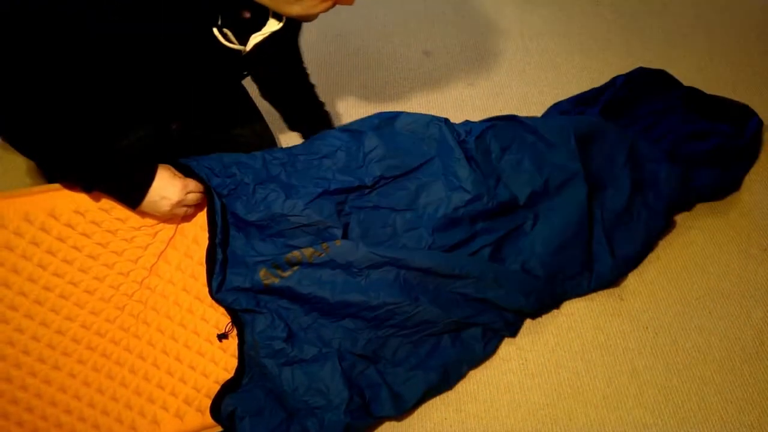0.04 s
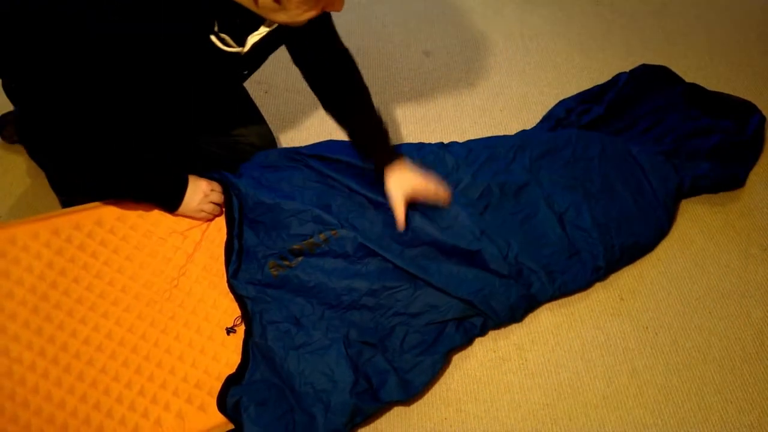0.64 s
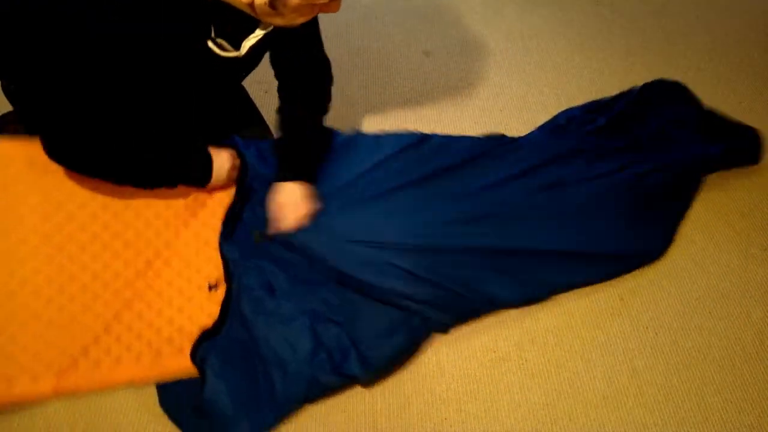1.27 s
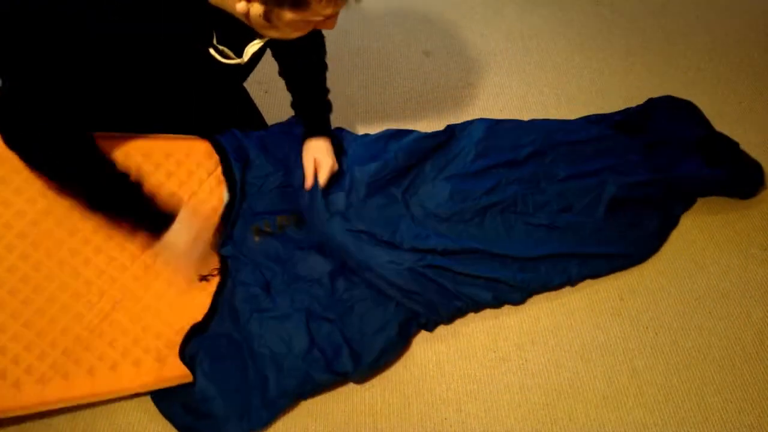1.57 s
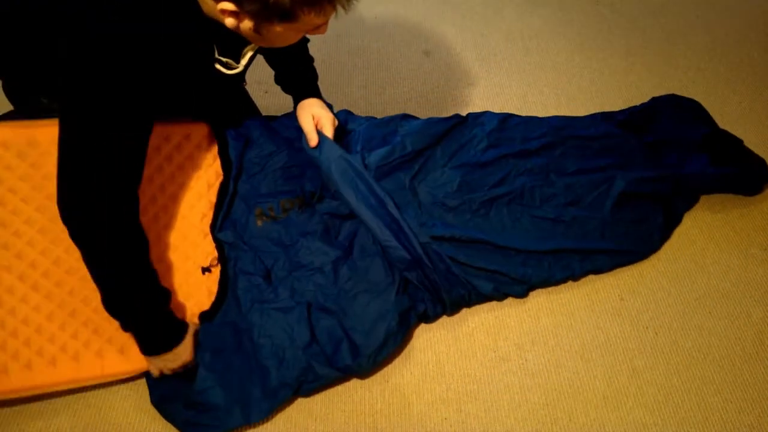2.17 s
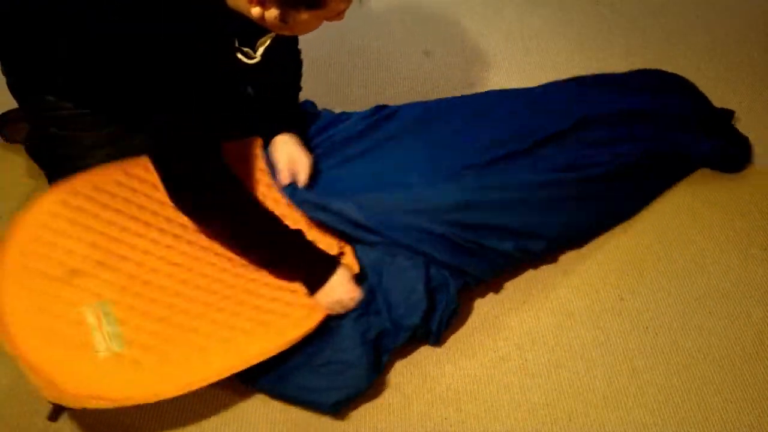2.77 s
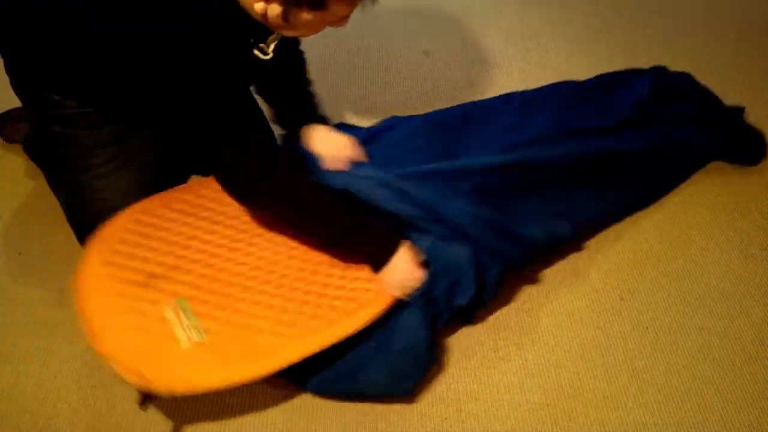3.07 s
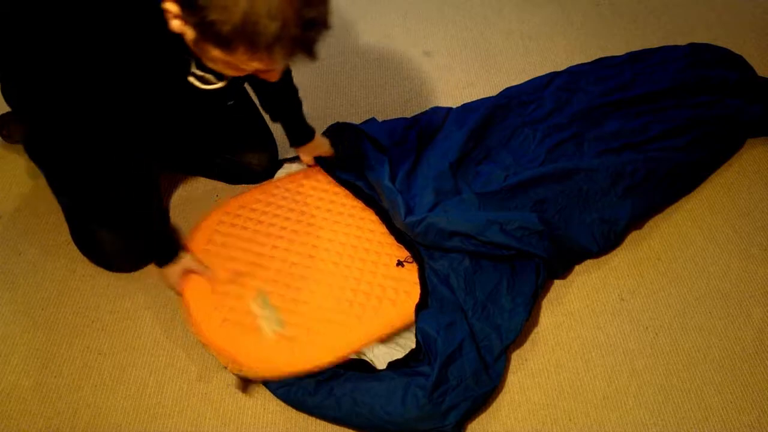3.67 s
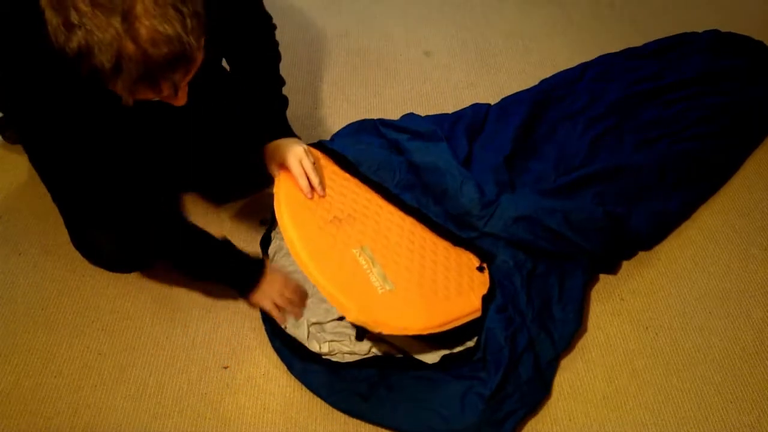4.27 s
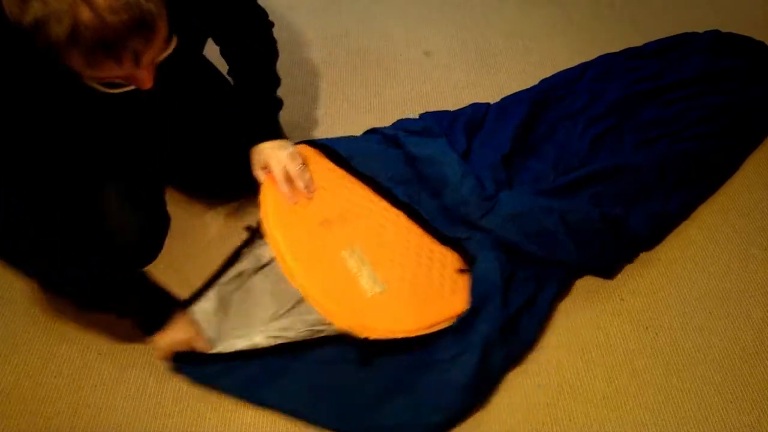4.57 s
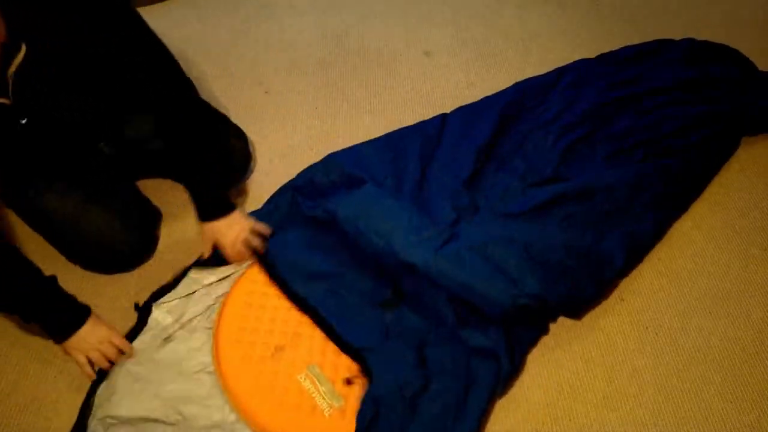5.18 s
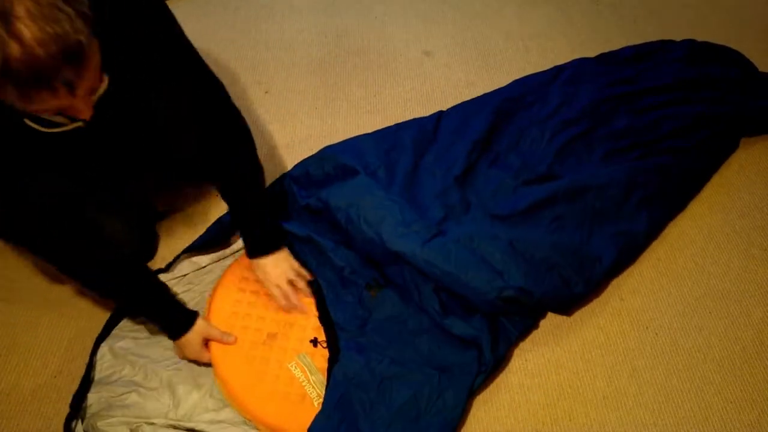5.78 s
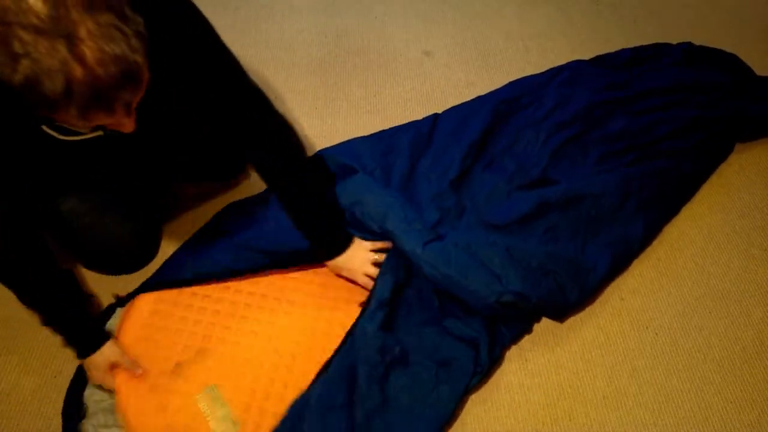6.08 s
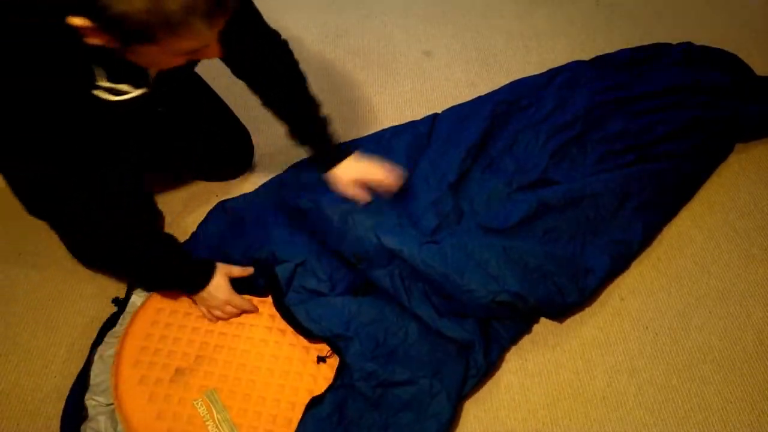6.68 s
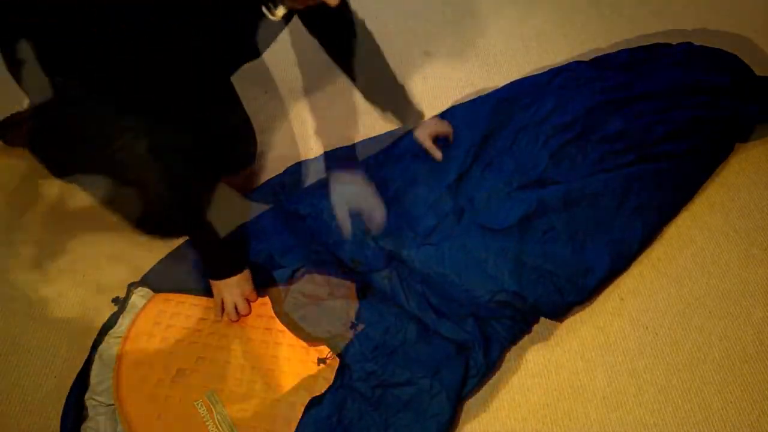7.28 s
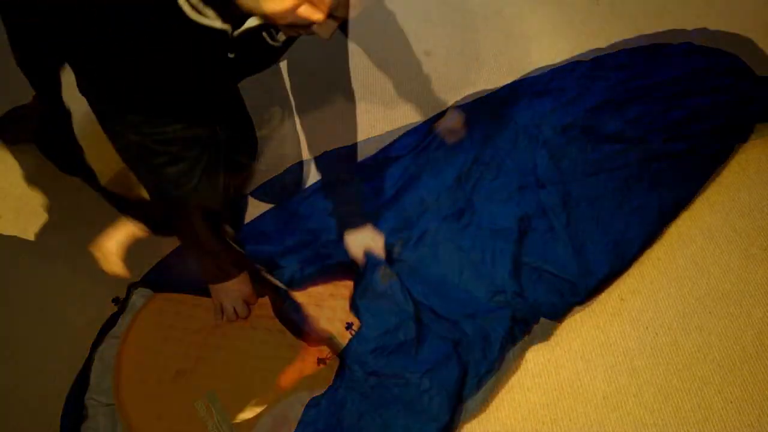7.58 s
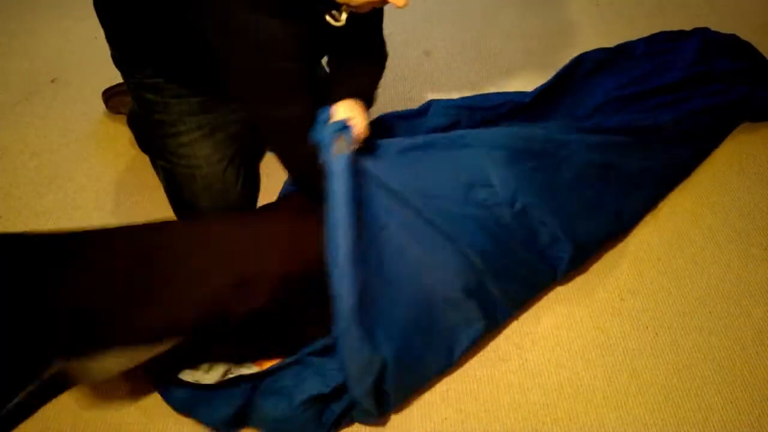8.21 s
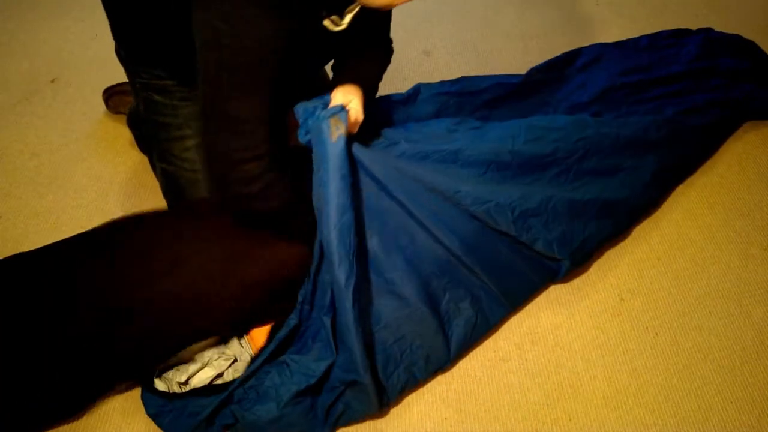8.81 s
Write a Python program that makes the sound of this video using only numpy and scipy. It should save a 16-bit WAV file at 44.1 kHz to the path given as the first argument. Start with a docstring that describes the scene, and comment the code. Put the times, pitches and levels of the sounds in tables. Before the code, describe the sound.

A waterproof sleeping bag cover swishes and crinkles in uneven strokes as someone tugs it over a padded mat and bedding. The loudest pulls come first, with sharp crease snaps and a hollow pat on the mat. Softer rustling follows, mixed with brief scuffs, faint squeaks and dull thuds of hands and knees on carpet, then another cluster of tugs near the end. It sounds close, in stereo, in a small room with a faint hum.

```python
"""Coated cloth of a waterproof bivvy bag swishes and crinkles as a sleeping mat and bedding are pushed in.
Each stroke is rubbing noise plus tiny buckles: taut cloth hisses, slack cloth flaps. Creases snap,
jerks release sprays of wrinkles, dragged threads squeak and the hollow mat scuffs.
Hands pat the mat; hands and knees thud on the carpeted floor. A small room with a faint hum answers,
and two closely spaced microphone ports each colour the treble in their own way."""
import sys
import numpy as np
from scipy import signal
from scipy.fft import rfft, irfft, next_fast_len
from scipy.io import wavfile
from scipy.ndimage import uniform_filter1d

SR = 44100
rng = np.random.default_rng(int(sys.argv[2]) if len(sys.argv) > 2 else 0)


def bounce(signal):
    """Save signal as a 16-bit WAV file at the path given by the first command-line argument."""
    frames = np.transpose(np.atleast_2d(signal))
    limited = np.clip(frames, -1, 1)
    pcm = np.round(limited * 32767).astype(np.int16)
    wavfile.write(sys.argv[1], SR, pcm)


N = 390285

# steady background: low room rumble, faint high microphone hiss (frequency [Hz], density [dB])
BACKGROUND_SPECTRUM = [(25, -19), (45, -8), (60, 3), (85, -5), (150, -3), (300, -7), (700, -12),
                       (2000, -24), (6000, -32.5), (12000, -23), (15000, -33)]
# low hum (frequency [Hz], rms level [dB])
HUM_TONES = [(83, -66.5)]
# room decay (frequency [Hz], t60 [s])
ROOM_T60 = [(200, 0.34), (1400, 0.27), (4000, 0.42), (10000, 0.3)]
# room peaks and dips (frequency [Hz], width [Hz], gain [dB])
ROOM_MODES = [(57, 30, -23), (93, 16, 4.5), (155, 59, -3.5), (251, 12, 2.5), (319, 21, 3), (402, 54, -3.5),
              (500, 44, -2), (704, 113, -4.5), (850, 40, 1.5), (988, 136, -2.5), (1133, 95, 4),
              (1235, 150, -2), (1433, 40, 4), (1682, 33, 4.5)]
# stereo width at the ports (frequency [Hz], side re mid [dB])
PORT_SIDE = [(60, -5.5), (260, -11.5), (450, -6.5), (800, -1), (1400, 1), (3000, 0), (15000, 0.5)]
# port balance (frequency [Hz], left re right [dB])
PORT_BALANCE = [(300, .4), (1000, 1), (1650, 5), (2800, -1.5), (3600, -4.5), (4300, -5.5), (5000, 1),
                (6000, 7), (8000, 17), (9000, 20), (11000, 3), (13000, 5), (15000, 0)]
# response common to both ports (frequency [Hz], gain [dB])
MIC_RESPONSE = [(3000, -2), (4200, -1), (5300, -2), (7000, -1), (8700, 2), (10700, -1.5), (12500, 0),
                (14800, -0.5)]

# hands, knees and mat landing on the floor (time [s], level [dB], pitch [Hz])
THUDS = [(0.136, -20.5, 237), (0.139, -27, 126), (.14, -26, 40), (0.214, -17, 255), (0.614, -33, 285),
         (1.294, -27, 332), (1.498, -28.5, 130), (1.51, -22, 96), (1.936, -27, 204), (1.94, -28.5, 85),
         (3.35, -31, 179), (4.038, -32, 251.4), (4.04, -31, 105), (4.33, -34.5, 99), (5.02, -32, 194),
         (5.217, -29, 325), (5.219, -39, 88), (6.952, -29, 97), (7.67, -41, 100), (8.2, -32, 103),
         (8.49, -30.5, 193)]
# hands on the mat (time [s], level [dB])
TAPS = [(0.608, -2), (4.045, -16), (4.173, -17), (6.697, -19), (6.891, -9), (7.458, -13)]
# thump of a tap (frequency [Hz], gain [dB])
THUMP_SPECTRUM = [(60, -27), (300, -6), (900, 7), (1500, 6), (2400, -1), (3500, -22), (8000, -15),
                  (15000, -64)]
# ring of the tapped mat (frequency [Hz], level [dB], t60 [s])
TAP_MODES = [(335, -15, 0.14), (615, -6, 0.04), (866, 9.5, 0.014), (1330, 2.5, 0.0087), (2320, 0, 0.01)]
# fingers of one tap (delay [s], level [dB])
FINGERS = [(0, -4), (.0035, 1), (.0065, -7), (.009, -23)]
# mat rubbing on cloth (time [s], length [s], level [dB], resonance [Hz])
MAT_RUBS = [(3.777, 0.08, -38.5, 750), (4.119, 0.063, -39, 604), (5.789, 0.44, -44, 595),
            (6.223, 0.11, -48, 610), (6.883, 0.058, -44, 810), (7.989, 0.068, -36, 580)]
# dragged mat and weave (time [s], length [s], level [dB], start pitch [Hz], end pitch [Hz])
SQUEAKS = [(2.103, .025, -47, 2100, 2550), (2.113, 0.065, -41.5, 4150, 3730),
           (3.675, 0.0256, -35.5, 1940, 2720), (4.087, 0.025, -45, 1790, 1770),
           (4.123, 0.032, -39.5, 877, 857), (4.396, 0.02, -40, 2010, 2050), (6.815, 0.082, -48, 2970, 2840),
           (7.207, 0.036, -56, 1435, 1580), (7.314, 0.035, -52, 1200, 1420)]

# bag jerked tight (time [s], level [dB], t60 [s])
JERKS = [(1.266, -16, 0.17), (2.995, -26, 0.22), (3.685, -34, 0.058), (6.346, -50, 0.23),
         (7.727, -28, 0.045), (7.799, -31, 0.049), (8.108, -40, 0.076)]
# spray of wrinkles (frequency [Hz], gain [dB])
JERK_SPECTRUM = [(60, -12), (260, 7.5), (600, 0), (1400, -8.5), (4000, -4.5), (6000, -10), (9000, -31),
                 (11000, -38)]
# big creases flipping (time [s], level [dB], brightness [dB], fold pitch [Hz])
CREASES = [(.181, 7, -31, 1110), (0.793, -2, -6, 4020), (1.143, 0.5, -8, 1970), (1.266, 7.5, -12, 1370),
           (1.929, -7.5, -6, 1170), (2.163, -9, -3, 3670), (2.996, -3, -23, 1370), (3.6, -17.5, -18, 1530),
           (3.658, -16.5, -11, 2310), (3.756, -4, -1, 2790), (3.801, -8, 19, 1990), (3.892, -5, -1, 1670),
           (4.047, -7.5, -22, 1720), (4.332, -9, -1, 5040), (4.515, -3.5, -6, 1750), (4.827, -3, -8, 3070),
           (5.795, -10.5, -8, 1030), (6.324, -1.5, -7, 1710), (6.633, -23.5, -9, 3730),
           (6.74, -17, -2, 970), (6.939, -4, -9, 2500), (7.778, -5, -13, 2000), (7.804, -6, -14, 1160),
           (8.062, -3.5, -3, 2800), (8.11, -5, -6, 2270), (8.375, -9.5, 1, 2320), (8.491, -9.5, -12, 1730)]
# crease snap (frequency [Hz], gain [dB])
CREASE_SPECTRUM = [(40, -12), (250, -18), (800, 1), (1600, 5), (4000, 8.5), (8500, 3), (11000, -13),
                   (15000, -18)]
# pushes and tugs (start [s], rise [s], hold [s], t60 [s], level [dB], tautness [dB], slackness [dB])
STROKES = [(-0.053, 0.046, 0.003, 0.53, -29.5, -3, -5), (0.098, 0.082, 0.025, 0.44, -22, -2.5, 2),
           (0.344, 0.078, 0.051, 1.0, -42.5, -4, 3.5), (0.678, 0.067, 0.0062, 1, -31.5, -1.5, 3),
           (0.829, 0.17, 0.0, 0.44, -22, 1.5, -2.5), (1.034, 0.12, 0.014, 0.77, -29.5, -3, -3.5),
           (1.222, 0.087, 0, 0.48, -20.5, -0.5, 1.5), (1.4, 0.096, 0.13, 0.31, -37, 0.5, 0.5),
           (1.643, 0.055, 0.15, 0.61, -46, -0.5, -3.5), (1.821, 0.12, 0, 0.48, -37, -1, 5.5),
           (2.037, 0.161, 0.013, 0.53, -41.5, 2.0, 3), (2.196, 0.27, 0.0, 0.79, -30, 0, -3.5),
           (2.6, 0.13, 0.0, 0.58, -25, 0.5, -1), (2.822, 0.06, 0.053, 0.5, -37.5, -4, -8),
           (2.953, 0.076, 0.0037, 0.69, -26.5, -1.0, 2.0), (3.099, 0.037, 0.051, 0.59, -34, -3, 1.5),
           (3.22, 0.11, 0.064, 0.41, -37, -2.5, 1.0), (3.571, 0.27, 0.025, 0.72, -31.5, 0, -1),
           (3.973, 0.19, 0.0, 0.55, -36.5, -1.5, 4), (4.27, 0.18, 0.13, 0.22, -38.5, 2, -1.5),
           (4.456, 0.058, 0.14, 0.5, -34.5, 0.5, 0), (4.651, 0.082, 0.03, 0.6, -31, 0.5, 1.5),
           (4.765, 0.069, 0.054, 0.46, -31.5, -2, 0), (4.898, 0.034, 0.1, 0.33, -37.5, -2.5, 1),
           (5.073, 0.17, 0.12, 0.62, -37, -1, -1.5), (5.387, 0.068, 0.077, 0.28, -43.5, 2.5, -9),
           (5.673, 0.131, 0.057, 0.35, -40.5, 0, 0), (5.812, 0.271, 0.02, 0.47, -32.5, 2, -1.0),
           (6.155, 0.16, 0.023, 0.61, -39, -1.5, 2), (6.295, 0.057, 0.028, 0.21, -32, 0, -9),
           (6.68, 0.031, 0.072, 0.4, -50.5, -1, 5.5), (6.789, 0.21, 0.0, 0.42, -37.5, 0.5, 1.5),
           (7.16, 0.079, 0.0, 0.53, -50.5, -4, 3), (7.311, 0.121, 0.0016, 0.35, -33.5, -0.5, -2),
           (7.484, 0.038, 0.1, 0.54, -37.5, 0.5, -4), (7.592, 0.066, 0.07, 0.57, -32.0, -3, -5),
           (7.722, 0.06, 0.022, 0.65, -33, 0, -0.5), (7.8, 0.13, 0.26, 0.57, -32.5, -0.5, 1),
           (8.183, 0.064, 0.11, 0.22, -34.5, 0.5, 1.5), (8.366, 0.018, 0.099, 0.57, -41.0, -3, 9),
           (8.546, 0.087, 0.005, 1.0, -46.5, -5, 3.5), (8.744, 0.157, 0.01, 0.47, -40, -1, 3.0)]
# sliding cloth (frequency [Hz], density [dB])
CLOTH_SPECTRUM = [(15, -43), (25, -9), (61, -14), (96, -1.5), (156, -12), (260, -0.5), (410, -6.5),
                  (482, -1.5), (1270, -4.5), (1410, -3), (4040, -6.5), (5880, -13), (8580, -14),
                  (10900, -26.5), (15500, -29)]
# taut cloth trades mids for treble (frequency [Hz], share of tautness [ratio])
TAUT_TILT = [(300, -0.13), (900, -0.39), (1650, -0.31), (2800, 0.049), (4200, 0.46), (6000, 0.73),
             (8500, 0.95), (12000, 1.0)]
# slack cloth flaps in the bass (frequency [Hz], share of slackness [ratio])
SLACK_TILT = [(90, 1), (170, 0.84), (300, 0.98), (550, 0.5), (950, 0.29), (1700, 0.013)]


def gain_of(db):
    """Decibels to amplitude."""
    return 10 ** (np.asarray(db) / 20)


def unit_rms(x):
    """Scale to rms 1."""
    return x / np.sqrt(np.mean(x ** 2) + 1e-20)


def curve_at(points, hz):
    """Interpolate a table over log frequency."""
    points_hz, values = np.transpose(points)
    return np.interp(np.log(hz + 1), np.log(points_hz + 1), values)


def add(mix, time_s, sound):
    """Mix in a stereo sound at time_s."""
    part = mix[:, max(round(time_s * SR), 0):][:, :sound.shape[1]]
    part += sound[:, :part.shape[1]]


def filtered(x, db_at):
    """Zero-phase filter with gain db_at(hz)."""
    size = next_fast_len(x.shape[-1] + 2048)
    gain = gain_of(db_at(np.fft.rfftfreq(size, 1 / SR)))
    return irfft(rfft(x, size) * gain, size)[..., :x.shape[-1]]


def click(db_at, size=1024):
    """Causal unit-energy click with spectrum db_at(hz)."""
    log_gain = np.log(gain_of(db_at(abs(np.fft.fftfreq(size, 1 / SR)))))
    pulse = np.fft.ifft(np.exp(np.conj(signal.hilbert(log_gain)))).real
    return pulse / np.linalg.norm(pulse)


def wander(t, step_s):
    """Random control of size about 1, one knot per step."""
    knots = rng.standard_normal(4000)
    return np.interp(t / step_s, np.arange(len(knots)), knots)


def background(noise_db=-57.5):
    """Steady low room rumble with faint high microphone hiss and a low hum."""
    t = np.arange(N) / SR
    mid, side = rng.standard_normal((2, N))
    side = filtered(side, lambda hz: curve_at(PORT_SIDE, hz))
    noise = filtered(np.array([mid + side, mid - side]), lambda hz: curve_at(BACKGROUND_SPECTRUM, hz))
    hum = sum(gain_of(db) * np.sqrt(2) * np.sin(2 * np.pi * hz * t) for hz, db in HUM_TONES)
    return gain_of(noise_db) * unit_rms(noise) + hum


def room(x, wet_db, size=12000, reflections=700, gap_s=0.002):
    """One spot on the floor to both ports: direct sound, then sparse decaying reflections."""
    echoes = np.zeros((2, size))
    delays = rng.integers(round(gap_s * SR), size, (2, reflections))
    np.put_along_axis(echoes, delays, rng.choice([-1., 1.], delays.shape), 1)
    hz, t, spectra = signal.stft(echoes, SR, nperseg=256)
    tail = signal.istft(spectra * gain_of(-60 * t / curve_at(ROOM_T60, hz)[:, None]), SR)[1]
    paths = gain_of(wet_db) * tail / np.linalg.norm(tail[0])
    paths[[0, 1], rng.integers(16, 26, 2)] += 1  # direct sound
    mid = paths.mean(0)
    side = filtered(paths[0] - mid, lambda hz: curve_at(PORT_SIDE, hz))  # long waves reach both alike
    response = np.array([mid + side, mid - side]) / np.linalg.norm(mid)
    return signal.fftconvolve(x[None], response, axes=1)


def billow(level_db=-25, mode_hz=39.2, t60_s=0.84):
    """Slack cloth shoves air and rings the room's lowest standing wave."""
    *_, slack_db = np.transpose(STROKES)
    t = np.arange(N) / SR
    frames_s = t[::256]
    shove = np.sqrt(gain_of(slack_db) ** 2 @ stroke_power(frames_s))
    push = rng.standard_normal(N) * np.interp(t, frames_s, shove)
    mode = np.sin(2 * np.pi * mode_hz * t[:SR]) * gain_of(-60 * t[:SR] / t60_s)
    return gain_of(level_db) * signal.fftconvolve(push, mode / np.linalg.norm(mode))[:N]


def thuds(rise_s=0.001, t60_s=0.067):
    """A soft weight rings the carpeted floor for a few cycles."""
    out, t = np.zeros((2, N)), np.arange(SR // 4) / SR
    envelope = (1 - np.exp(-t / rise_s)) * gain_of(-60 * t / t60_s)
    for time_s, db, hz in THUDS:
        ring = np.sin(2 * np.pi * hz * t) * envelope
        add(out, time_s, gain_of(db) * room(ring, wet_db=-6))
    return out


def taps(thump_db=-5):
    """Fingers land on the padded mat in turn, each with a dull, hollow pat."""
    out, t = np.zeros((2, N)), np.arange(2048) / SR
    ring = sum(gain_of(db - 60 * t / t60_s) * np.sin(2 * np.pi * hz * t) for hz, db, t60_s in TAP_MODES)
    thump = click(lambda hz: curve_at(THUMP_SPECTRUM, hz), size=len(t))
    pat = ring / np.linalg.norm(ring) + gain_of(thump_db) * thump
    for time_s, db in TAPS:
        for delay_s, finger_db in FINGERS:
            finger = np.convolve(pat, shiver(decay_s=0.0012))
            add(out, time_s + delay_s, gain_of(db + finger_db) * room(finger, wet_db=2))
    return out


def mat_rubs(width_oct=0.45, overtone_ratio=3.7, overtone_db=-10):
    """Friction shakes the air-filled mat's skin: a hollow scuff with a weaker upper resonance."""
    def bell(hz, centre_hz):
        return 1 / (1 + (2 * np.log2((hz + 1) / centre_hz) / width_oct) ** 2)
    out = np.zeros((2, N))
    for time_s, length_s, db, mat_hz in MAT_RUBS:
        def skin_db(hz):
            overtone = gain_of(overtone_db) * bell(hz, overtone_ratio * mat_hz)
            return 20 * np.log10(bell(hz, mat_hz) + overtone)
        n = round(length_s * SR)
        scuff = unit_rms(filtered(rng.standard_normal(n), skin_db)) * signal.windows.tukey(n, 0.5)
        add(out, time_s, gain_of(db) * room(scuff, wet_db=-14))
    return out


def squeaks(jitter_ratio=0.075, slip_samples=24):
    """Threads catch in turn at the speed of the drag: a short, rough, gliding tone."""
    out = np.zeros((2, N))
    for time_s, length_s, db, start_hz, end_hz in SQUEAKS:
        n = round(length_s * SR)
        slip = unit_rms(uniform_filter1d(rng.standard_normal(n), slip_samples))
        hz = np.linspace(start_hz, end_hz, n) * (1 + jitter_ratio * slip)
        tone = np.sin(2 * np.pi * np.cumsum(hz) / SR) * np.hanning(n)
        add(out, time_s, gain_of(db) * room(unit_rms(tone), wet_db=-8))
    return out


def jerks(rise_s=0.00099):
    """A sudden pull releases a decaying spray of wrinkles."""
    out, t = np.zeros((2, N)), np.arange(SR // 4) / SR
    for time_s, db, t60_s in JERKS:
        spray = unit_rms(filtered(rng.standard_normal(len(t)), lambda hz: curve_at(JERK_SPECTRUM, hz)))
        envelope = (1 - np.exp(-t / rise_s)) * gain_of(-60 * t / t60_s)
        add(out, time_s, gain_of(db) * room(spray * envelope, wet_db=1.5))
    return out


def shiver(decay_s, size=1024):
    """A buckled panel shivers: a tiny, spectrally flat burst of energy about 1."""
    burst = rng.standard_normal(size) * np.exp(-np.arange(size) / SR / decay_s)
    phase = np.angle(rfft(burst))
    return irfft(np.exp(1j * phase), size)[:size // 2]


def creases(ring_db=7, ring_oct=0.19):
    """A crease flips with one sharp snap, coloured by the size of its fold."""
    out = np.zeros((2, N))
    for time_s, db, bright_db, fold_hz in CREASES:
        def snap_db(hz):
            fold_db = ring_db * np.exp(-(np.log2((hz + 1) / fold_hz) / ring_oct) ** 2)
            return curve_at(CREASE_SPECTRUM, hz) + curve_at(TAUT_TILT, hz) * bright_db + fold_db
        snap = np.convolve(click(snap_db), shiver(decay_s=0.0019))
        add(out, time_s, gain_of(db) * room(snap, wet_db=-7.5))
    return out


def crinkles(per_s, spread_db, clump_db, clump_s, decay_s):
    """Tiny buckles of the coating: shivering clicks of unequal size, clumped by a wandering level."""
    sizes = gain_of(spread_db * np.minimum(rng.exponential(1, N), 5))
    clicks = sizes * rng.choice([-1., 1.], N) * (rng.random(N) < per_s / SR)
    clumps = gain_of(clump_db * wander(np.arange(N) / SR, clump_s))
    return signal.oaconvolve(unit_rms(clicks * clumps), shiver(decay_s))[:N]


def stroke_power(t, settle_db=-20.5, settle_t60_s=2.27):
    """Power per stroke over time: it speeds up, holds, slows, and the folds settle."""
    start_s, rise_s, hold_s, t60_s, db, _, _ = np.transpose(STROKES)[:, :, None]
    attack = np.sin(np.pi / 2 * np.clip((t - start_s) / rise_s, 0, 1)) ** 3
    after_s = np.maximum(t - start_s - rise_s - hold_s, 0)
    release = gain_of(-60 * after_s / t60_s) ** 2
    settle = gain_of(settle_db - 60 * after_s / settle_t60_s) ** 2
    return gain_of(db) ** 2 * attack * (release + settle)


def cloth_patches(count=14, rub_db=-2.5, stray_db=-13.5):
    """Steady texture: patches of cloth rub and crinkle while small creases flip at random."""
    patches = np.zeros((2, N))
    for _ in range(count):
        buckles = crinkles(per_s=150, spread_db=3.5, clump_db=3, clump_s=0.018, decay_s=0.00074)
        rubbing = gain_of(rub_db) * rng.standard_normal(N)
        patches += room(rubbing + buckles, wet_db=2.5)[:, :N]
    strays = crinkles(per_s=6.8, spread_db=-2.5, clump_db=0, clump_s=0.046, decay_s=0.00098)
    return patches / np.std(patches.mean(0)) + gain_of(stray_db) * room(strays, wet_db=-1)[:, :N]


def rustle(trim_db=1.1, fold_db=1.37, catch_db=0.44, catch_s=0.02):
    """Strokes slide the cloth, which catches and gives; taut cloth hisses, slack cloth flaps."""
    hz, t, spectra = signal.stft(cloth_patches(), SR, nperseg=512, noverlap=384)
    *_, taut_db, slack_db = np.transpose(STROKES)
    colour = unit_rms(gain_of(curve_at(CLOTH_SPECTRUM, hz)))[:, None]
    tilt_db = np.outer(curve_at(TAUT_TILT, hz), taut_db) + np.outer(curve_at(SLACK_TILT, hz), slack_db)
    motion = np.sqrt(gain_of(tilt_db) ** 2 @ stroke_power(t))
    motion *= gain_of(catch_db * wander(t, catch_s))
    # folds form and vanish, each briefly favouring its own band
    folds = uniform_filter1d(rng.standard_normal(motion.shape), size=6, axis=0)
    folds = unit_rms(uniform_filter1d(folds, size=12, axis=1))
    spectra = spectra * colour * motion * gain_of(fold_db * folds)
    return gain_of(trim_db) * signal.istft(spectra, SR, nperseg=512, noverlap=384)[1][:, :N]


def scene():
    """Handling coloured by the room's standing waves, plus billow and background."""
    def modes_db(hz):
        return sum(db / (1 + (2 * (hz - mode_hz) / width_hz) ** 2)
                   for mode_hz, width_hz, db in ROOM_MODES)
    handling = rustle() + jerks() + creases() + squeaks() + mat_rubs() + taps() + thuds()
    return filtered(handling, modes_db) + billow() + background()


def record(dry, cutoff_hz=15550):
    """Each port's own treble resonance, split at constant power; then the band limit."""
    def ports_db(hz):
        left_power = gain_of(curve_at(PORT_BALANCE, hz)) ** 2
        shares = np.array([left_power, np.ones_like(left_power)]) / (1 + left_power)
        return curve_at(MIC_RESPONSE, hz) + 10 * np.log10(2 * shares)
    low_pass = signal.firwin(511, cutoff_hz, window=("kaiser", 9), fs=SR)
    return signal.oaconvolve(filtered(dry, ports_db), low_pass[None], "same", axes=1)


dry = scene()
out = record(dry)
bounce(out)
```